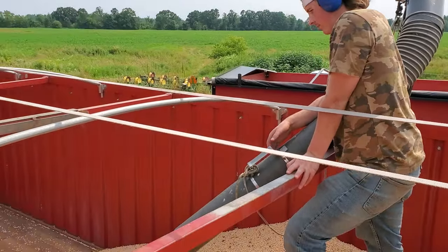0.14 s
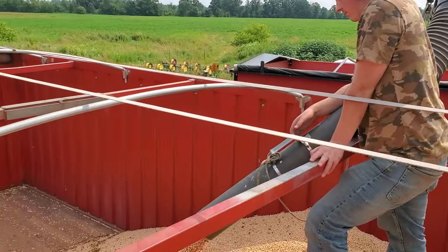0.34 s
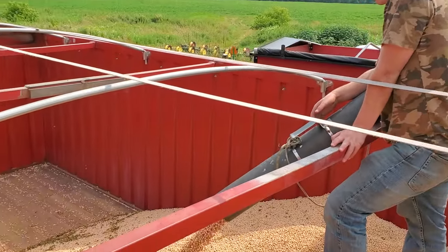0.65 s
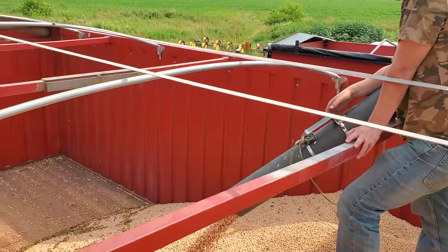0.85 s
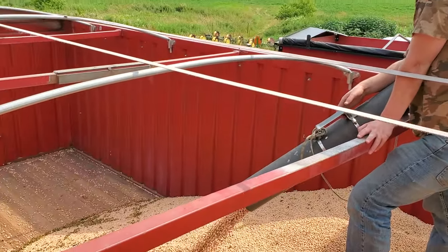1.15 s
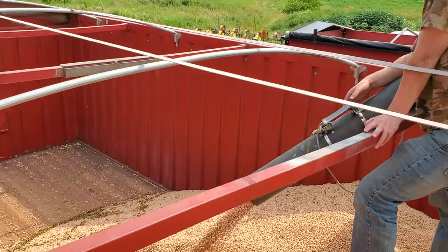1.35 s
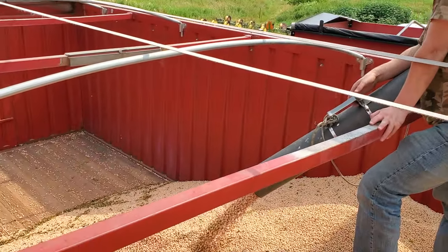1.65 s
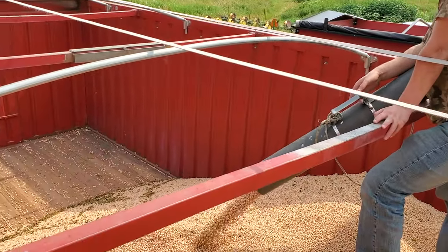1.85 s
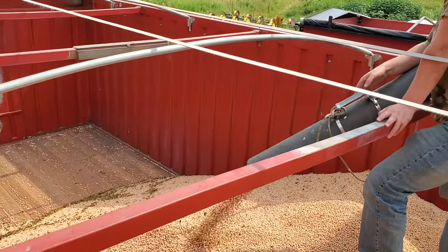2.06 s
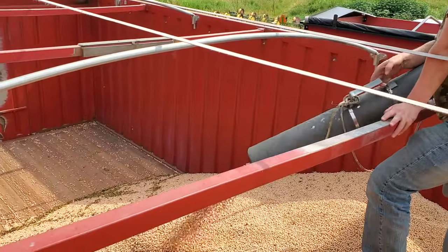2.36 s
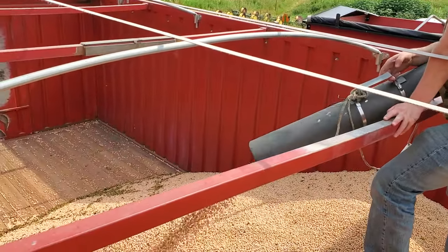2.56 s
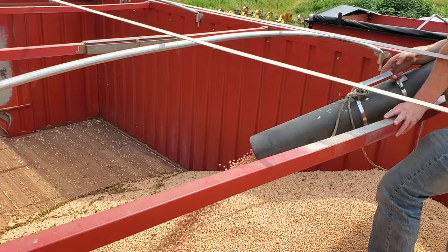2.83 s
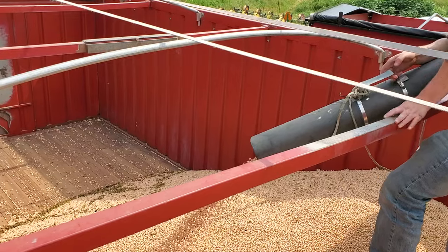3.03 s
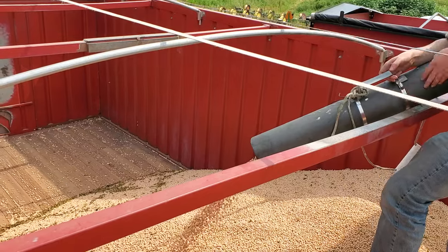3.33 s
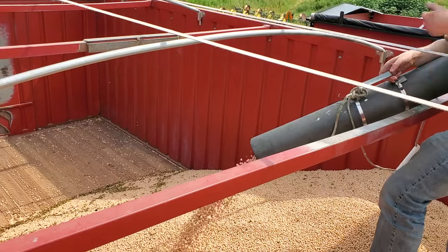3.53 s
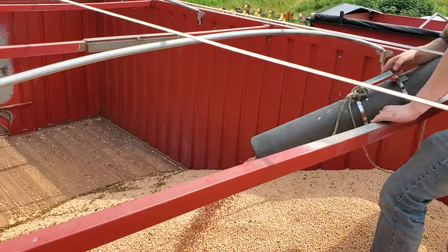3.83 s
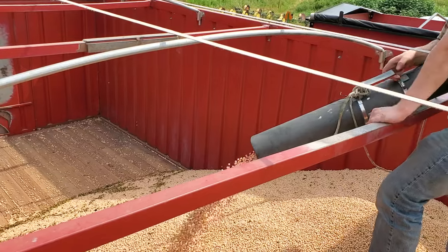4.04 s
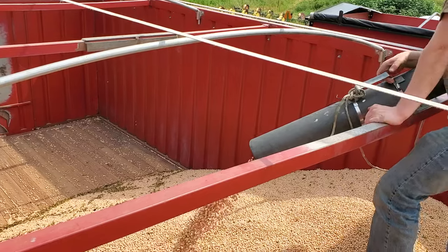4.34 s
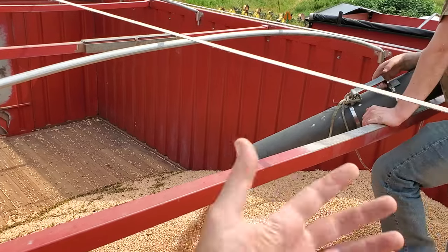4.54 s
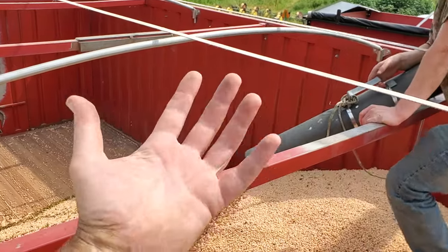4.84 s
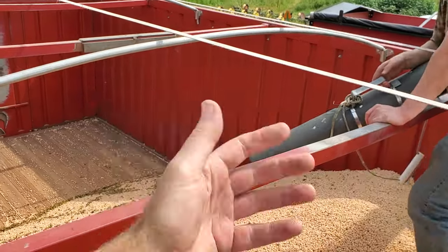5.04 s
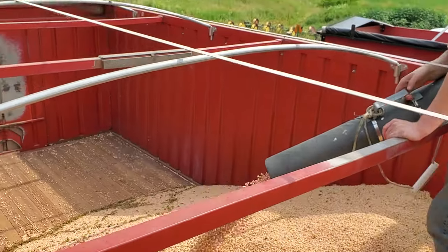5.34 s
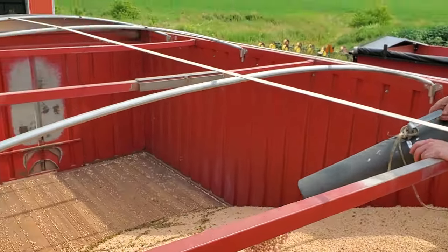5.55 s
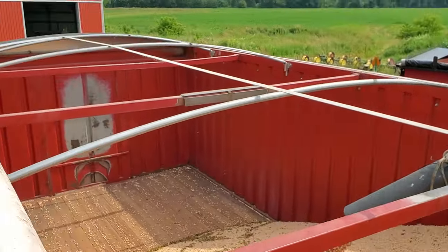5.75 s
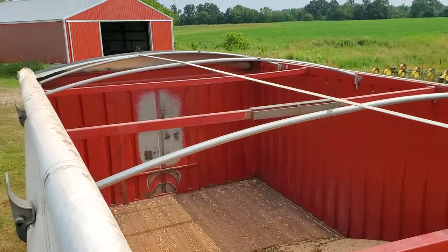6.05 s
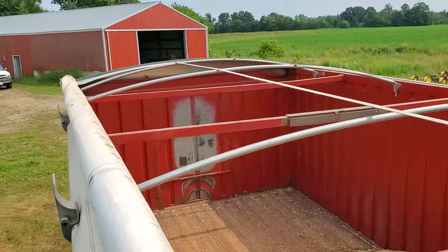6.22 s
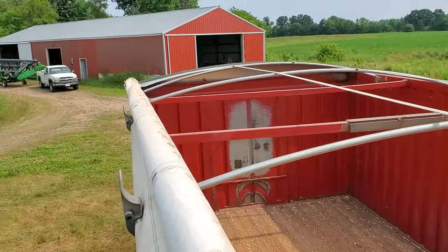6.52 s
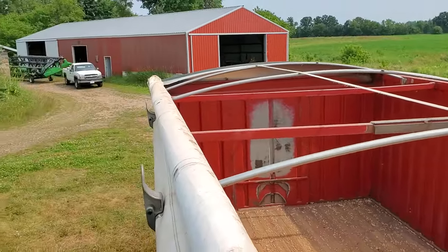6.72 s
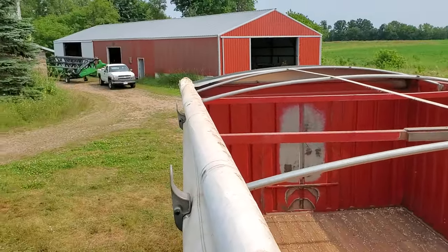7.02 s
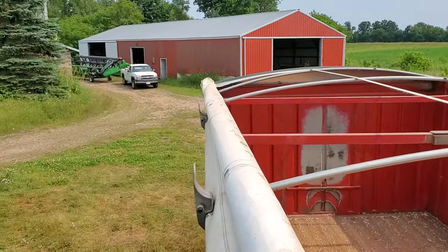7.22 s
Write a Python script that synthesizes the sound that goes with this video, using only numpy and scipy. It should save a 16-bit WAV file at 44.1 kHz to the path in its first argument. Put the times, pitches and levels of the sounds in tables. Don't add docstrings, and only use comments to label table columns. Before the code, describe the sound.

Dried peas pour in a dense, bright hissing rattle into a steel truck bed while a diesel drones, a blower whines and wind buffets the microphone.

```python
import sys
import numpy as np
from scipy import signal
from scipy.fft import rfft, irfft, next_fast_len
from scipy.io import wavfile
from scipy.ndimage import uniform_filter1d, map_coordinates

SR = 44100
rng = np.random.default_rng(int(sys.argv[2]) if len(sys.argv) > 2 else 0)


def digitize_waveform(pressure):
    field = np.atleast_2d(pressure).T
    bounded = np.clip(field, -1, 1)
    quanta = np.round(bounded * 32767).astype(np.int16)
    wavfile.write(sys.argv[1], SR, quanta)


def gain_from_decibels(decibels):
    exponent = np.asarray(decibels, float) / 20
    return 10 ** exponent


N = 325458
TIME_S = np.arange(N) / SR
SIZE = next_fast_len(N)
HZ = np.maximum(np.arange(SIZE // 2 + 1) * SR / SIZE, 1)


def rms_one(x):
    return x / np.sqrt(np.mean(x ** 2) + 1e-20)


def in_time(rows):
    s, *columns = np.transpose(rows)
    return np.array([np.interp(TIME_S, s, column) for column in columns])


def at_hz(points):
    hz, value = np.transpose(points)
    return np.interp(np.log(HZ), np.log(hz), value)


def colour(x, gain):
    return irfft(rfft(x, SIZE) * gain, SIZE)[..., :N]


def drift(rate):
    r = np.exp(-80 * np.pi * rate / SR)
    steps = rng.standard_normal(N // 40 + 2002)
    slow = signal.lfilter([1], [1, -2 * r, r * r], steps)[2000:]
    return np.interp(np.arange(N) / 40, np.arange(len(slow)), rms_one(slow - slow.mean()))


def hump(hz, centre_hz, width_hz):
    return 1 / (1 + (2 * (hz - centre_hz) / width_hz) ** 2)


def patches(shape, bins, frames):
    field = rng.standard_normal(shape)
    for axis, size in ((1, bins), (2, frames), (1, bins), (2, frames)):
        field = uniform_filter1d(field, size=size, axis=axis, mode="wrap")
    return rms_one(field)


# start_s, left_lag_samples, left_ridge_hz (reflected into the left port), ridge_db
HAND_POSES = [
    (0, 7.4, 2500, 5.5),
    (.25, 10, 3120, 4.5),
    (.8, 12.8, 3510, 6),
    (2.0, 12.3, 3450, 4.0),
    (4.2, 11.7, 3440, 8.5),
    (4.92, 11.5, 4420, 4.5),
    (5.7, 15.6, 4420, -1),
    (6.35, 15.9, 2580, 0),
    (7.0, 17, 2750, 3),
]


def poses(s):
    turn_s = 0.52
    begun = np.clip((s - np.array(HAND_POSES)[1:, :1]) / turn_s + .5, 0, 1)
    return -np.diff(np.vstack([1 + 0 * s, begun, 0 * s]), axis=0)


def left_lag(s):
    return np.array(HAND_POSES)[:, 1] @ poses(s)


def turned_away(s, facing_lag=12.2):
    return np.maximum(left_lag(s) - facing_lag, 0)


# pitch_hz, share (0 to 1)
SHARED_SOUND = [(100, 0.66), (400, 1), (800, 0.5), (1100, 0.61), (1450, 0.32), (1850, 0.69), (2500, 0.17),
                (3100, 0.35), (4500, 0.1), (15000, 0.056)]


def two_ports(direct, scattered):
    heard_at = np.arange(N) - left_lag(TIME_S)
    late = map_coordinates(direct, [heard_at], order=3, mode="nearest")
    share = np.clip(at_hz(SHARED_SOUND), 0, 1)
    return rfft([late, direct], SIZE) * np.sqrt(share) + rfft(scattered, SIZE) * np.sqrt(1 - share)


# start_s, held_s, level_db
WIND_SWELLS = [(.5, 0.24, -21.5), (.85, 0.18, -25.5), (1.45, .1, -40), (1.85, .1, -31), (2.5, .3, -28.5),
               (3.3, .15, -34), (3.85, .3, -33), (4.5, .3, -33), (5.0, .4, -32), (5.5, .35, -27),
               (6.33, .1, -25.5), (6.6, .35, -26), (7.15, .25, -25.5)]


def swells():
    rise_db_per_s, fall_db_per_s, calm_db = 50, 78, -66
    each = []
    for start, held, db in WIND_SWELLS:
        before = np.maximum(start - TIME_S, 0)
        after = np.maximum(TIME_S - start - held, 0)
        each.append(db - rise_db_per_s * before - fall_db_per_s * after)
    return np.maximum(np.max(each, axis=0), calm_db)


# time_s, port (0 left, 1 right), level_db
WIND_SLAPS = [(0.247, 1, -20), (0.56, 0, -16), (0.574, 1, -10.5), (0.725, 0, -18), (0.751, 1, -11),
              (0.973, 1, -25), (1.853, 0, -16), (1.883, 1, -20), (2.025, 0, -20), (2.492, 1, -18),
              (4.138, 1, -26), (4.712, 1, -24), (5.356, 0, -20), (5.471, 1, -15.5), (5.51, 0, -20.0),
              (5.563, 1, -15), (5.611, 0, -18), (5.794, 1, -17), (6.366, 0, -15.5), (6.376, 1, -24),
              (6.542, 1, -18), (6.678, 1, -15.5), (6.755, 0, -17), (6.865, 1, -22), (6.918, 0, -25),
              (6.956, 1, -24), (7.034, 1, -23), (7.127, 1, -19), (7.24, 1, -13), (7.336, 0, -18.5)]
# pitch_hz, level_db
THUMP_COLOUR = [(15, -30), (30, -26), (50, -1.5), (75, 0), (120, -10), (180, -20.5), (300, -41.5)]
# pitch_hz, level_db
RUSH_COLOUR = [(60, -29), (120, 2.5), (200, -4), (300, -10.5), (450, -18.5), (800, -48)]


def breeze(lumpy_db=2.0, apart_db=1.5, steepness=1.74, slap_s=0.015, snap_s=0.0092):
    lumps_db = lumpy_db * np.array([drift(16.6), drift(4.3)])
    gust = gain_from_decibels(swells() + lumps_db + apart_db * np.array([drift(2.7), drift(1.6)]))
    slaps = np.zeros((2, N))
    for s, port, db in WIND_SLAPS:
        slaps[round(port), round(s * SR)] = gain_from_decibels(db - 1.0)

    def strength(width_s):
        bell = np.exp(-.5 * (np.arange(-3000, 3001) / SR / width_s) ** 2)
        return np.hypot(gust, signal.fftconvolve(slaps, [bell], mode="same"))

    thump, snap = strength(slap_s), strength(snap_s)
    buffet = rms_one(colour(rng.standard_normal((2, N)), gain_from_decibels(at_hz(THUMP_COLOUR))))
    rush = rms_one(colour(rng.standard_normal((2, N)), gain_from_decibels(at_hz(RUSH_COLOUR))))
    buffet /= np.sqrt(uniform_filter1d(buffet ** 2, size=2500, axis=1))
    rush /= np.sqrt(uniform_filter1d(rush ** 2, size=900, axis=1))
    middle = N // 2
    click = np.roll(np.arange(N) == 0, middle)
    push = colour(click, gain_from_decibels(at_hz(RUSH_COLOUR)) * np.sqrt(HZ))[middle - 3000:middle + 3001]
    pushes = signal.fftconvolve(slaps, [push / push.max()], mode="same")
    return gain_from_decibels(4) * pushes + thump * buffet + gain_from_decibels(-29) * (snap / gain_from_decibels(-22.0)) ** steepness * rush


def tone(turns, left_db, right_db):
    late = np.gradient(turns) * 10
    phase = np.array([turns - late, turns]) + rng.random()
    return gain_from_decibels(np.array([[left_db], [right_db]])) * np.sqrt(2) * np.sin(2 * np.pi * phase)


# pitch_hz, wander_hz, left_db, right_db (re drone)
BLOWER_TONES = [
    (203.3, 0.41, -10, -11),
    (300, 0.58, -29, -33.5),
    (362, 0.59, -36, -42),
    (602, 1.07, -32.5, -41),
    (615, 1.82, -38.5, -35),
]
# pitch_hz, level_db (per Hz)
AIR_COLOUR = [(20, -28), (40, -8), (60, -3.5), (100, -4), (200, -4.5), (350, -9), (500, -18), (800, -45),
              (1200, -40)]


def blower():
    tones = 0
    for hz, wander_hz, left, right in BLOWER_TONES:
        turns = np.cumsum(hz + wander_hz * drift(2.67)) / SR
        tones = tones + tone(turns, left, right) * gain_from_decibels(0.88 * drift(3.5))
    air = rng.standard_normal((3, N))
    rumble = irfft(two_ports(air[0], air[1:]) * gain_from_decibels(at_hz(AIR_COLOUR)), SIZE)[:, :N]
    return tones + gain_from_decibels(-17) * rms_one(rumble) * gain_from_decibels([[1.5], [-1.5]])


# multiple of the engine cycle, left_db, right_db (re drone)
ENGINE_ORDERS = [(6, 0, 0), (12, -19, -23), (16, -25, -28), (24, -26, -30), (26, -29, -36), (30, -35, -39),
                 (38, -28, -32), (43, -31, -37), (48, -33, -42), (57, -37, -40), (63, -35, -37),
                 (74, -36, -33), (87, -34, -32)]
KNOCK_LEVELS = [-9, -14, -13, 9, 8, -4, -27, -2, 0, -4, 1, -1.5]
# pitch_hz, level_db (per Hz)
KNOCK_COLOUR = [(150, 5), (300, -1), (500, -7), (700, -20), (1000, 4.5), (1400, -11), (2200, -3),
                (4000, -28)]


def engine(cycle_hz=14.257):
    cycles = np.cumsum(cycle_hz * (1 + 0.0004 * drift(0.51))) / SR
    away = turned_away(TIME_S, facing_lag=13.2)
    orders = 0
    for order, left, right in ENGINE_ORDERS:
        sway_db = .5 * drift(3.7) + 0.027 * (order - 7) * drift(0.62)
        turn_db = 2.8 * away * hump(order, 46.7, 7.0)
        orders = orders + tone(order * cycles, left, right) * gain_from_decibels(sway_db + turn_db)
    places = (np.arange(12) + rng.uniform(-.3, .3, 12)) / 12
    turns = (np.arange(int(cycles[-1]))[:, None] + places).ravel()
    knocks_db = np.resize(KNOCK_LEVELS, len(turns)) + rng.normal(0, 0.46, len(turns))
    knocks = np.zeros(N)
    knocks[np.searchsorted(cycles, turns)] = gain_from_decibels(knocks_db)
    ringing = np.exp(2j * np.pi * np.interp(HZ, np.arange(0, 5000, 9), rng.random(556)))
    knocks = rms_one(colour(knocks, gain_from_decibels(at_hz(KNOCK_COLOUR)) * ringing))
    return orders + gain_from_decibels(-23) * np.array([np.roll(knocks, 12), gain_from_decibels(1.5) * knocks])


def impacts(per_s, spread_db):
    sizes = gain_from_decibels(spread_db * rng.standard_normal((3, N))) * rng.choice([-1, 1], (3, N))
    return rms_one(sizes * (rng.random((3, N)) < per_s / SR))


# pitch_hz, level_db (per Hz)
STREAM_COLOUR = [(600, -7), (850, -11), (1400, -8), (1900, -4), (2500, -3.5), (3400, -2.2), (4500, -2.5),
                 (5400, -6), (6800, -4), (8000, -13), (9000, -7.5), (10400, -10.5), (12400, -10),
                 (15000, -15.5)]
# pitch_hz, width_hz, level_db
PEA_MODES = [(5830, 260, 3.5), (9050, 300, 2.5), (10950, 260, 3.5), (13020, 260, 3), (15250, 220, 2.5)]
# pitch_hz, width_hz, left_db, right_db
STEEL_MODES = [(3350, 380, -1.5, 3.5), (4440, 160, 1, 6.5), (4940, 250, 2.5, -11)]
# pitch_hz, level_db
RIGHT_COLOUR = [(600, -4), (850, -3.5), (1400, 0.8), (1900, -1.5), (2500, -4), (3400, -5.5), (4500, -6.5),
                (5400, -2.5), (6800, -10.5), (8000, 3.5), (9000, 9), (10400, 6.5), (12400, 4), (15000, 3.5)]
# pitch_hz, width_hz, db_per_sample of extra lag
BODY_SHADOW = [(870, 180, 0), (2500, 1100, 0.16), (4270, 1500, -0.5)]
# time_s, level_db
PEA_FLOW = [
    (0, -25),
    (1.8, -25),
    (2.15, -23.5),
    (3.5, -25.2),
    (4.3, -24.3),
    (5.4, -25),
    (6.75, -27),
    (7.38, -25),
]


def peas(streak_db=1.0, patchy_db=0.43, surge_db=0.07):
    ticks = impacts(per_s=22000, spread_db=2.0)
    rings_db = sum(db * hump(HZ, hz, width) for hz, width, db in PEA_MODES)
    bed_db = sum(np.outer([left, right], hump(HZ, hz, width)) for hz, width, left, right in STEEL_MODES)
    heard = two_ports(ticks[0], ticks[1:]) * gain_from_decibels(at_hz(STREAM_COLOUR) + rings_db + bed_db)
    heard *= 1 - np.exp(-(HZ / 500) ** 4)
    heard[1] *= gain_from_decibels(at_hz(RIGHT_COLOUR))

    hz, s, cells = signal.stft(irfft(heard, SIZE)[:, :N], SR, nperseg=512)
    hz, away = hz[:, None], turned_away(s)
    gain_db = streak_db * patches(cells.shape, bins=2, frames=60)
    gain_db += patchy_db * patches(cells.shape, bins=25, frames=12)
    gain_db += (0.4 - .25 * away) * np.clip(np.log2(hz / 5000 + 1e-9), 0, 1)
    gain_db += away * sum(db * hump(hz, centre_hz, width_hz) for centre_hz, width_hz, db in BODY_SHADOW)
    _, _, left_hz, left_db = np.transpose(HAND_POSES)
    left_ridge = hump(hz, left_hz, 330) - 0.45 * hump(hz, 0.87 * left_hz, 240)
    gain_db[0] += (left_db * left_ridge) @ poses(s)
    right_hz = 2040
    right_ridge = hump(hz, right_hz, 240) - 0.62 * hump(hz, 1.6 * right_hz, 400)
    gain_db[1] += (4 - 1.5 * away) * right_ridge
    pan_db = -0.26 * (away - away.mean())
    gain_db += .5 * pan_db * np.array([1, -1])[:, None, None]
    stream = signal.istft(cells * gain_from_decibels(gain_db), SR, nperseg=512)[1][:, :N]
    return rms_one(stream) * gain_from_decibels(in_time(PEA_FLOW)[0] + surge_db * drift(16.0) + 6.5)


def scene():
    machine_db = -19.5 - 0.29 * turned_away(TIME_S)
    return breeze() + gain_from_decibels(machine_db) * (blower() + engine()) + peas()


def top_cut(x):
    return signal.sosfilt(signal.butter(12, 15740, fs=SR, output="sos"), x)


def record(dry):
    duck_from_db, duck_share, recover_db_per_s, duck_s = -8.0, 0.36, 2.5, 0.032
    slope = recover_db_per_s * TIME_S
    level_db = 20 * np.log10(np.abs(dry).max(axis=0) + 1e-9)
    held_db = np.maximum.accumulate(level_db + slope) - slope
    over_db = np.maximum(held_db - duck_from_db, 0)
    duck_db = uniform_filter1d(duck_share * over_db, size=int(duck_s * SR), origin=int(duck_s * SR / 2) - 1)
    mix = 1.584 * np.tanh(dry * gain_from_decibels(-duck_db) / 1.422)
    return top_cut(mix)


dry = scene()
out = record(dry)
digitize_waveform(out)
```